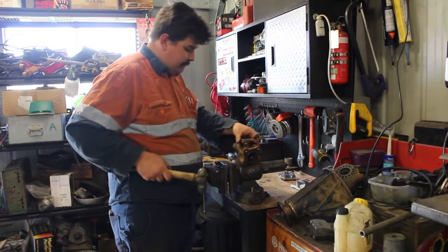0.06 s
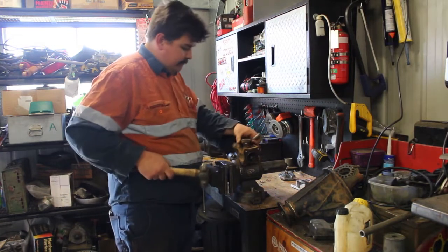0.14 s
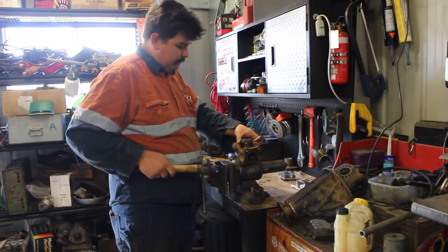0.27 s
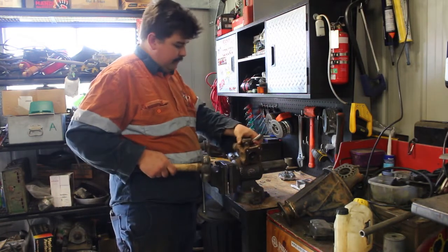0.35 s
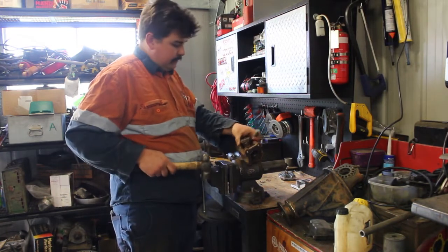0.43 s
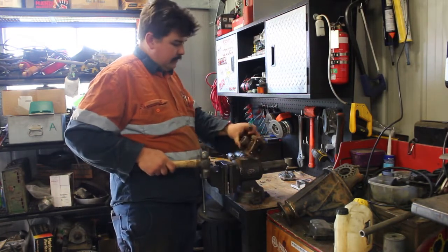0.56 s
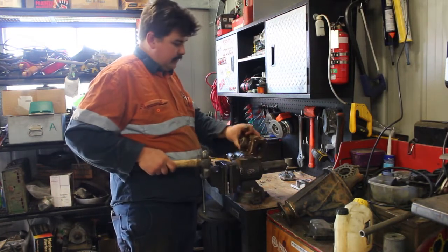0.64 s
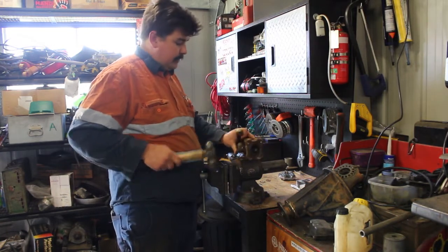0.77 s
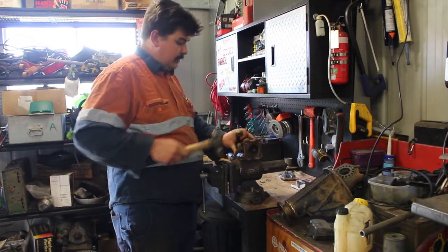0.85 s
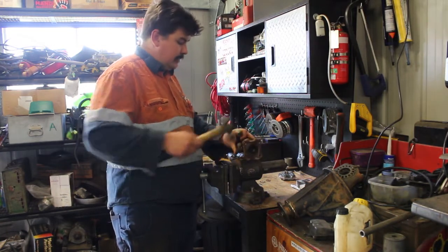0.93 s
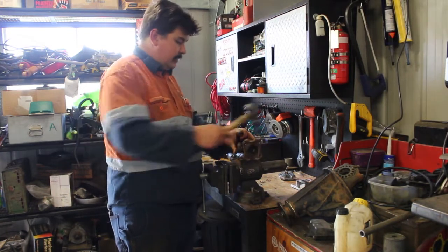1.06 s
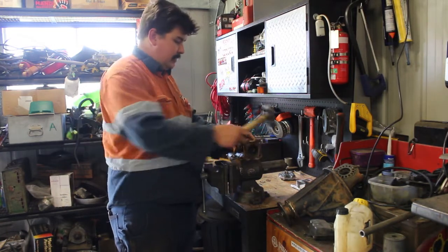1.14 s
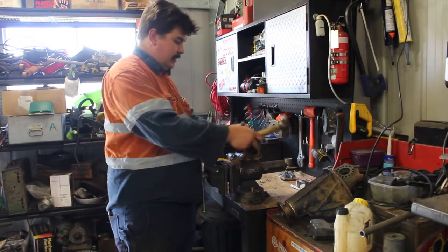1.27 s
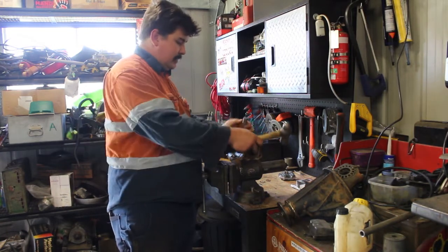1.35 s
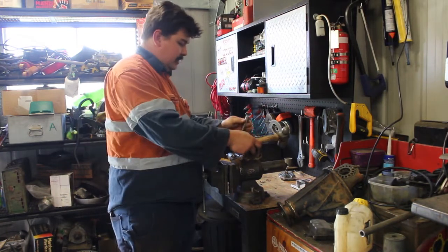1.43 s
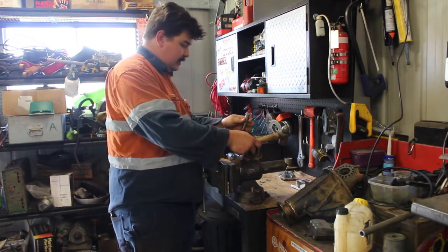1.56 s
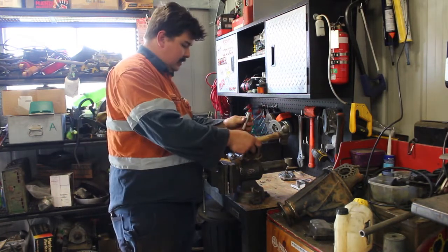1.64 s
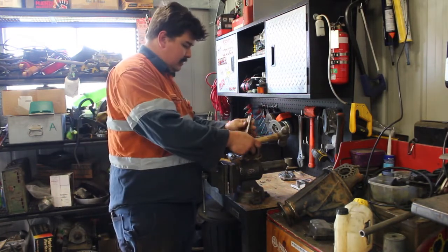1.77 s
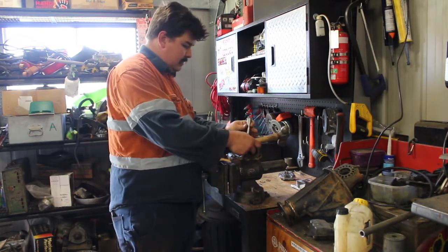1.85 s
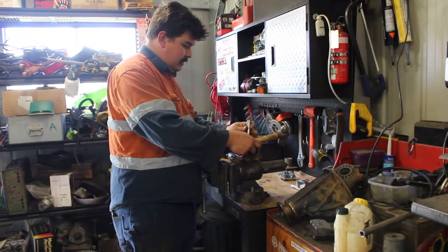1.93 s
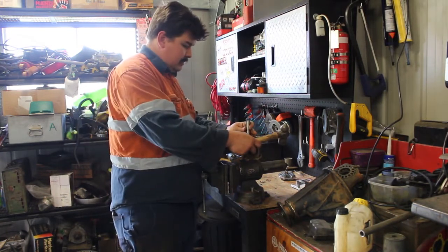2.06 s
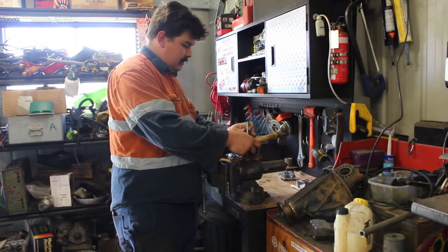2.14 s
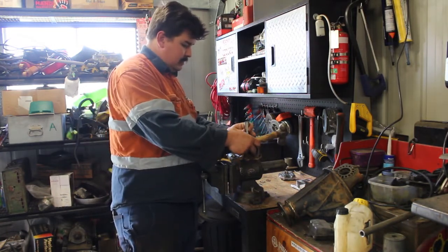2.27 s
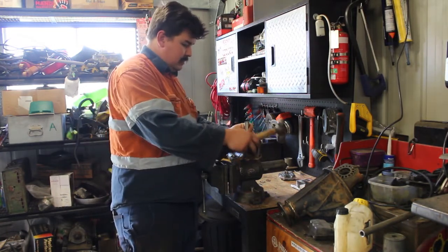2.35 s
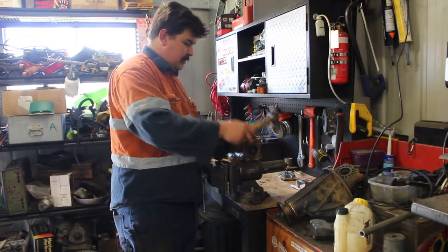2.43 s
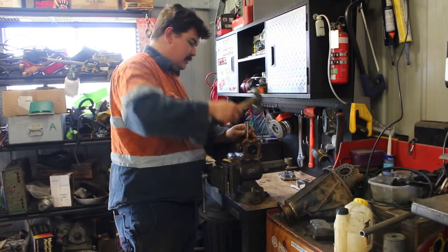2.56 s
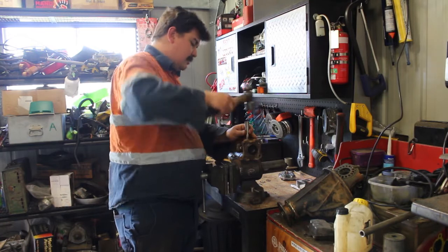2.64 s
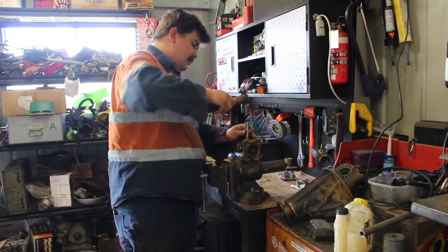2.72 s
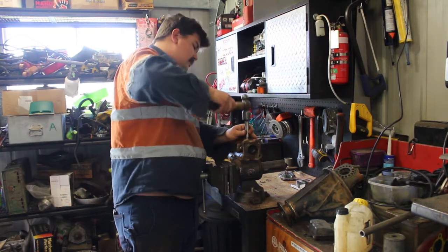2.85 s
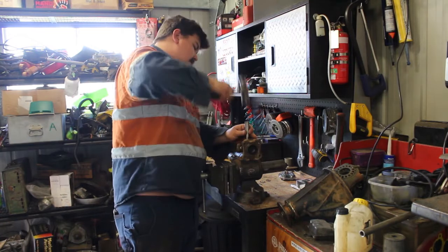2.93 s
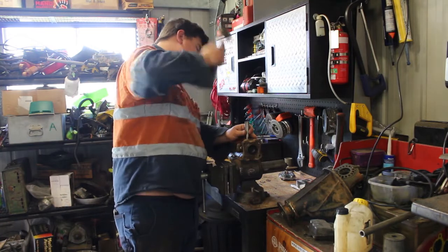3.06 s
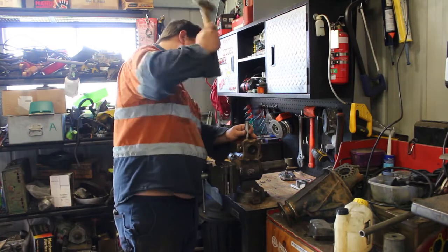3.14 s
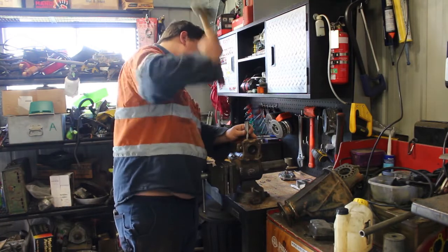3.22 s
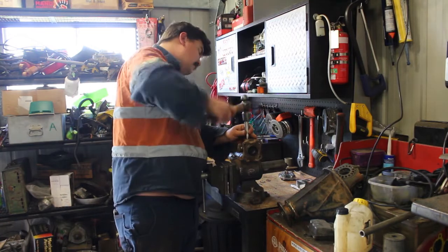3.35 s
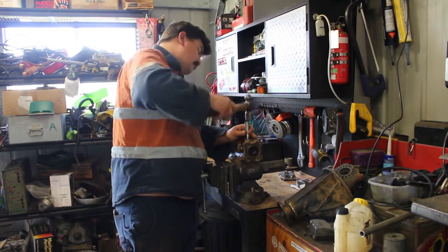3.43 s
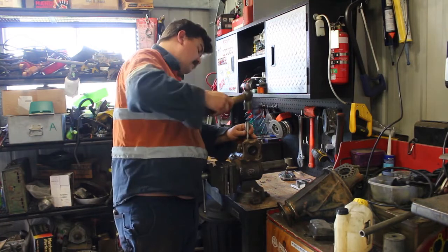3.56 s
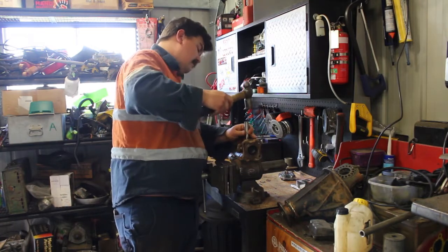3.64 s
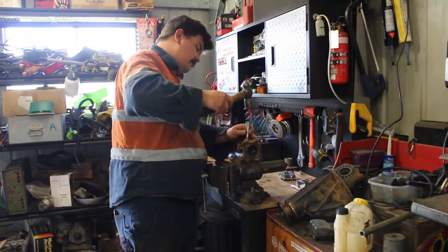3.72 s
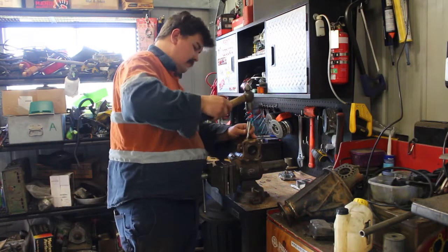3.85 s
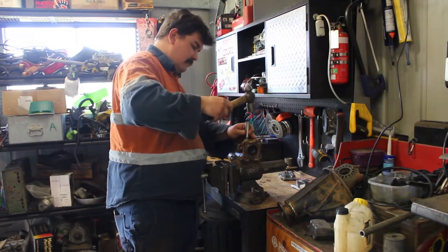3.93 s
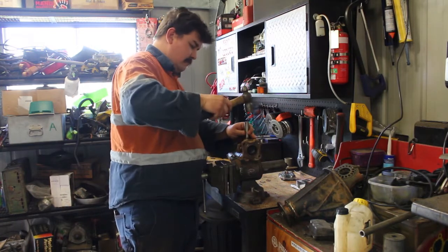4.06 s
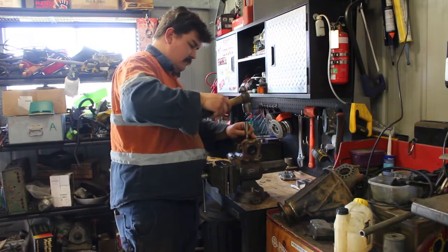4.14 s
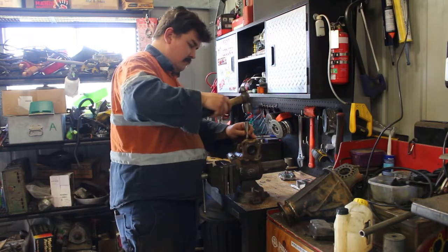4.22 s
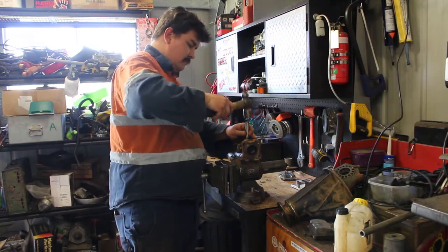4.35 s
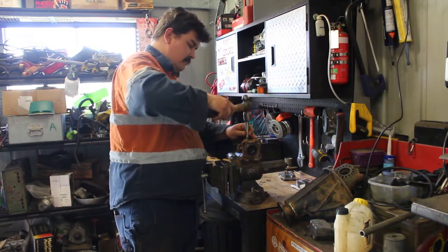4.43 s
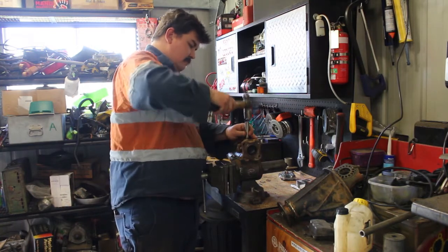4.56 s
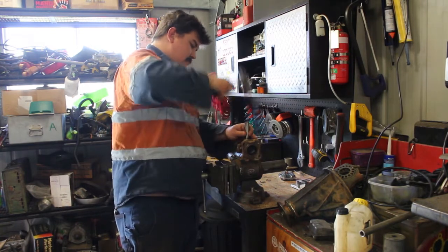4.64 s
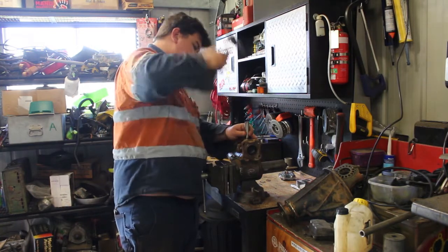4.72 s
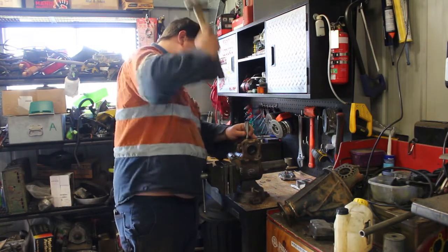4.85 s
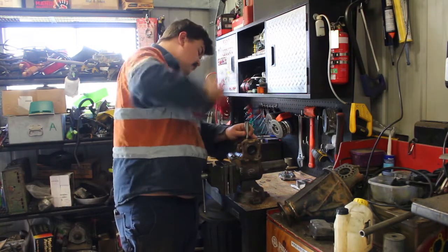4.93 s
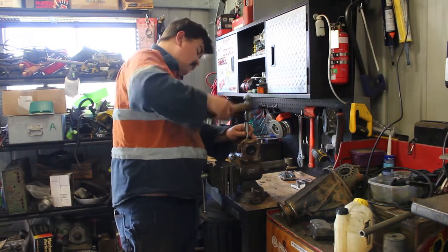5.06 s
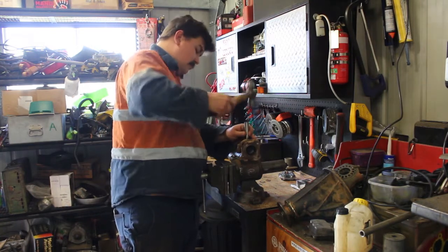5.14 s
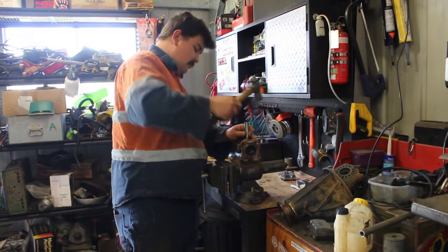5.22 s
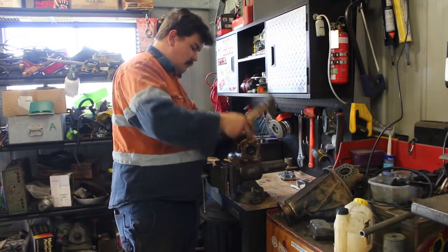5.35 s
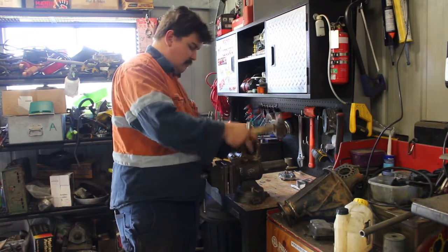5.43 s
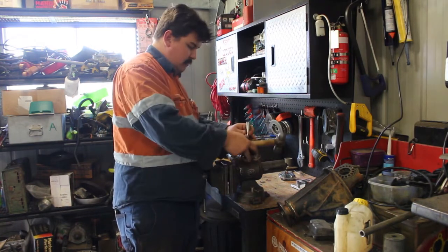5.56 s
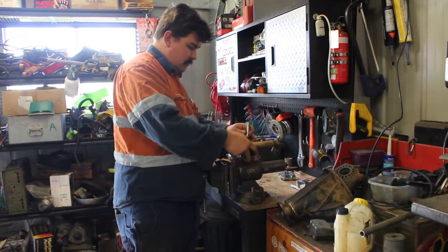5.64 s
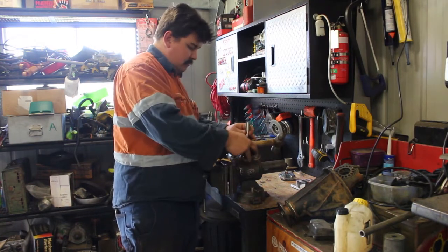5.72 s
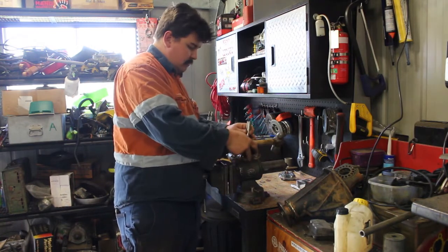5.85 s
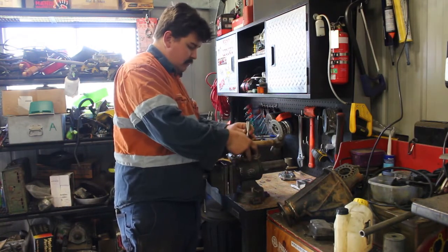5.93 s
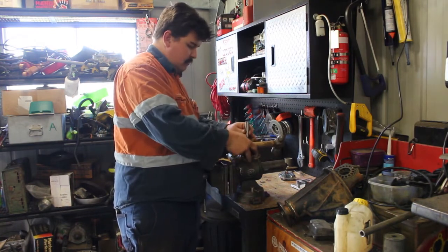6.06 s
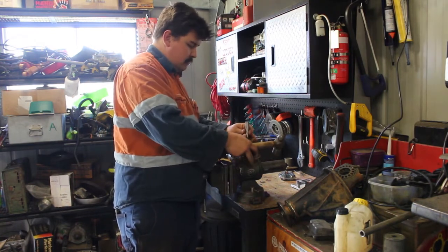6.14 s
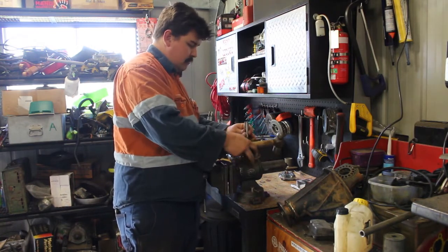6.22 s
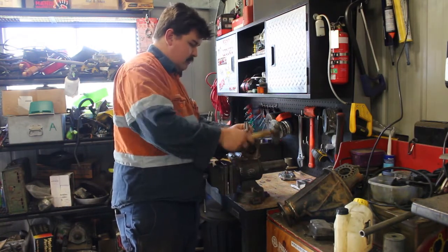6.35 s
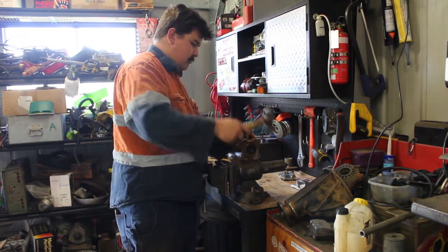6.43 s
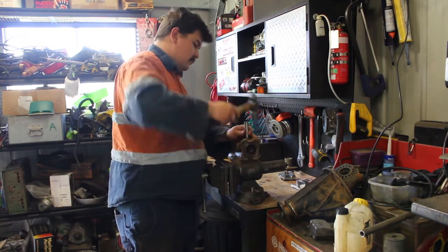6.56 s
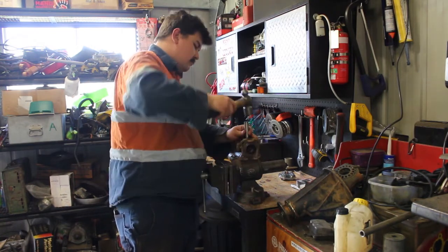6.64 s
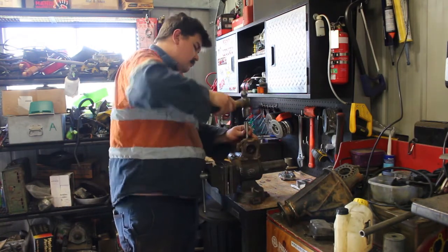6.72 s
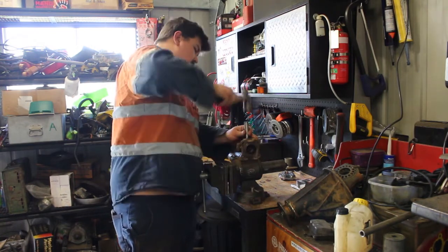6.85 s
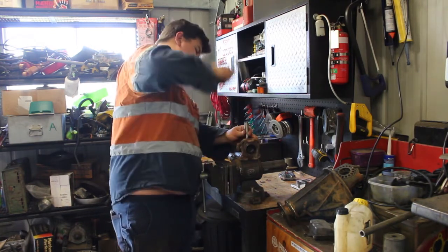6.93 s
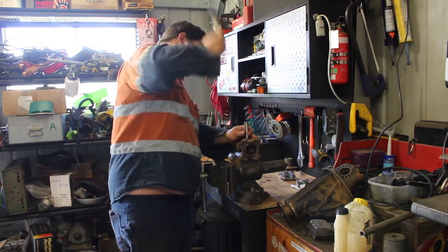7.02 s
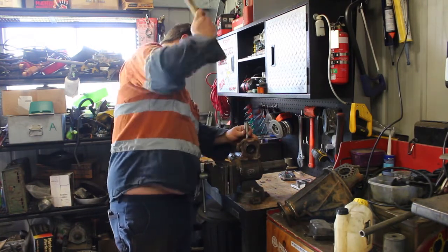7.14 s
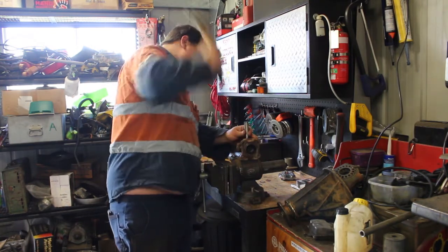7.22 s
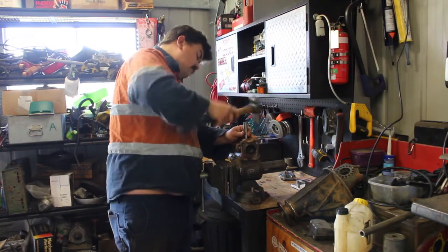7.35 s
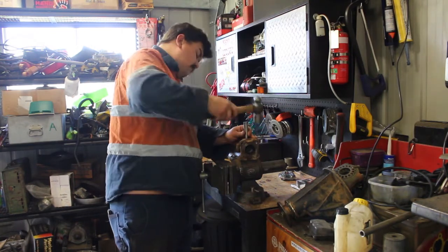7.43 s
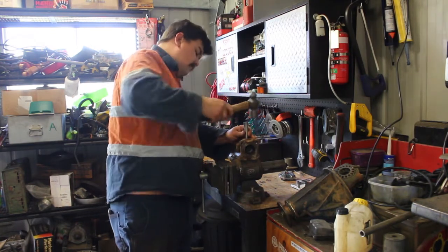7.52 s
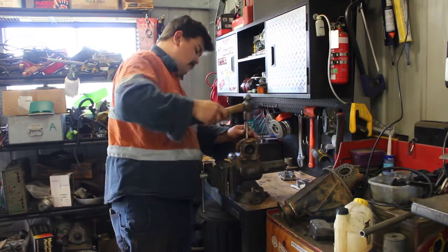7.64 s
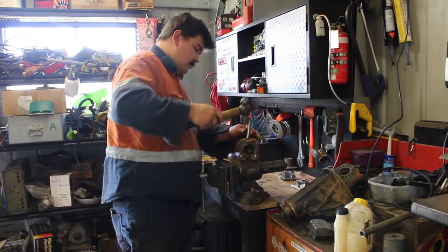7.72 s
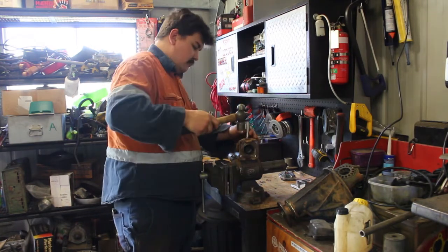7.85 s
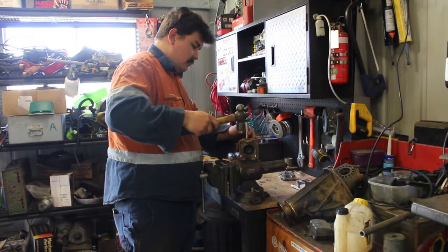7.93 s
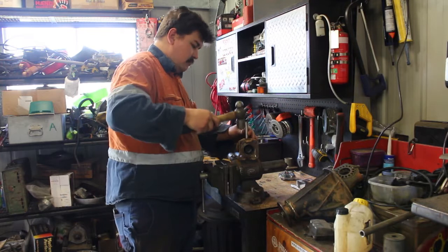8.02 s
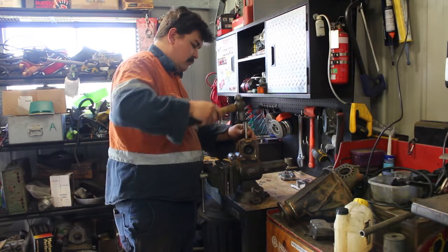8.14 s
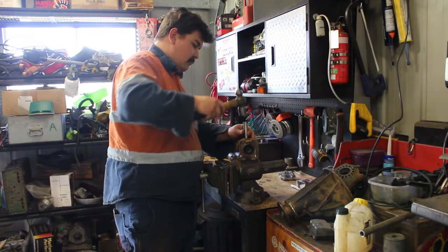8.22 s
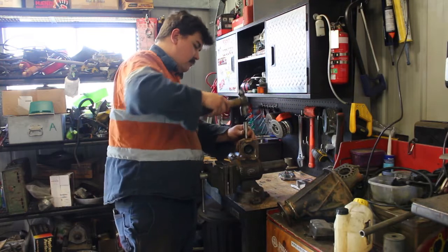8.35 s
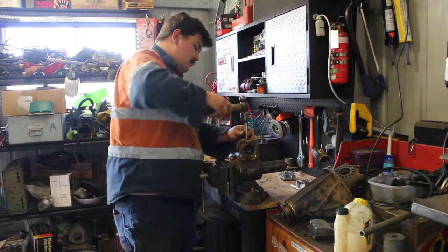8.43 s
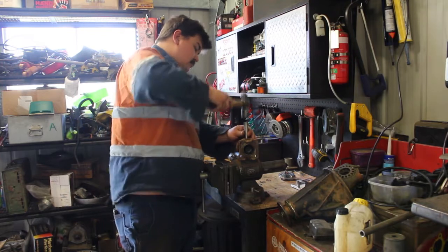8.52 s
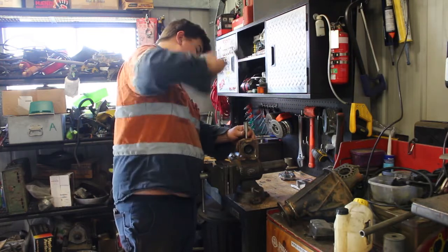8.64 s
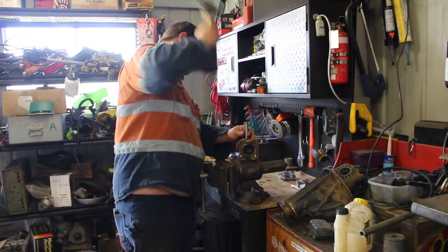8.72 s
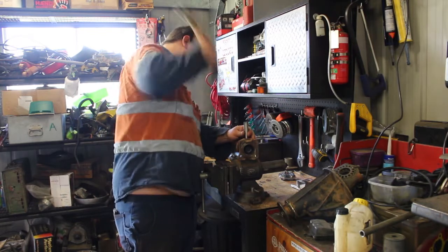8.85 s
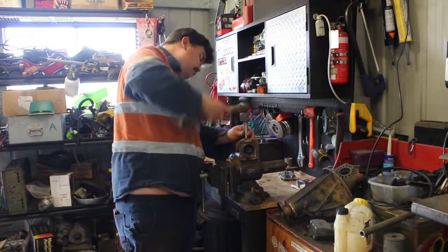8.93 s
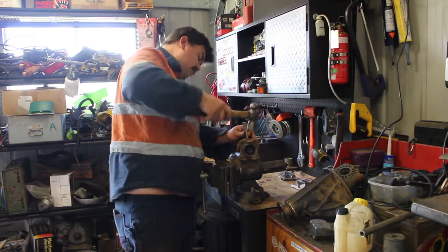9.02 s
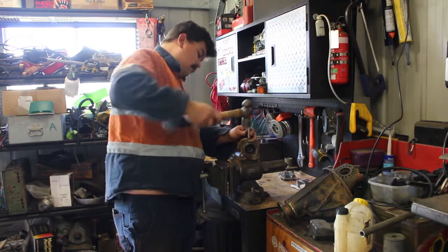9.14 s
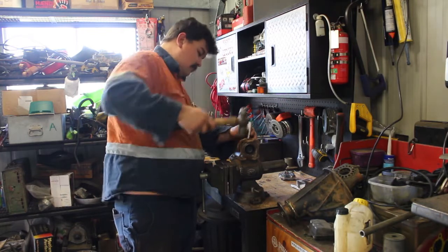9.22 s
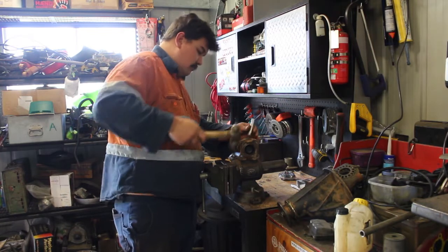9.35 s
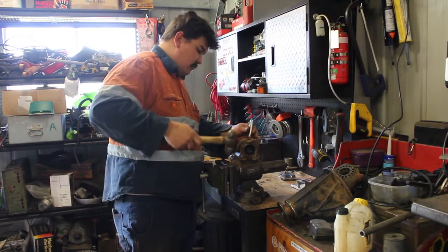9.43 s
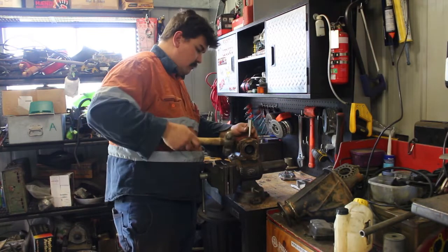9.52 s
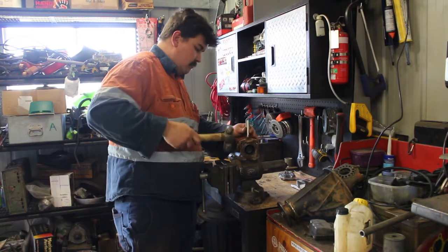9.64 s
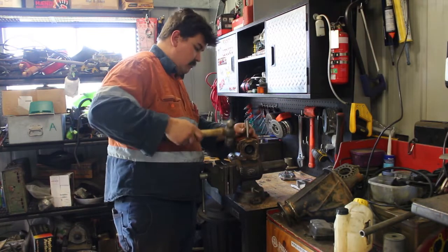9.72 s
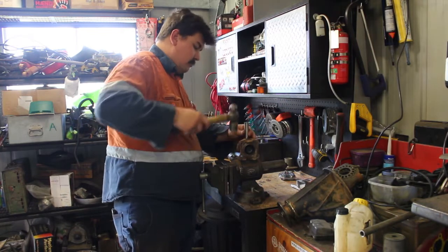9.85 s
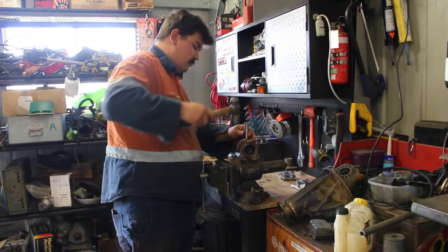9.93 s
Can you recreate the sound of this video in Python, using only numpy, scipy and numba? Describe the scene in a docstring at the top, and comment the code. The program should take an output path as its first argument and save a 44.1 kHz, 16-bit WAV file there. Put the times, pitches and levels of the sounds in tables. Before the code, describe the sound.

Heavy hammer blows clang on a clamped steel part in a small metal workshop, full swings alternating with lighter taps over a faint low hum.

```python
"""Heavy hammer blows clank and boom in a small sheet-metal workshop; lining-up blows alternate with full swings.
Steel hits a shaft yoke in a vise: short pulses through damped modes, then a lingering cluster of sines.
Between blows: softer knocks, clunks, ticks and scrapes, from the same steel spectrum; loose metal sings on.
Beneath: a wavering low hum, faint drones, air noise and a thin whistle, all from sines and shaped noise.
The blows overload the microphone: its limiter holds their echo level, then lets it fall."""
import sys
import numpy as np
from scipy import signal
from scipy.fft import rfft, irfft
from scipy.io import wavfile
from scipy.ndimage import minimum_filter1d
from numba import njit

SR = 44100
rng = np.random.default_rng(int(sys.argv[2]) if len(sys.argv) > 2 else 0)


def wav_out(sig):
    """Save sig, one row per channel (or a flat mono array), as 16-bit PCM at SR to the path in sys.argv[1]."""
    wavfile.write(sys.argv[1], SR, np.round(np.clip(np.atleast_2d(sig).T, -1, 1) * 32767).astype(np.int16))


N = 440118

# hammer blows, the first before time zero: t/s, relative level/dB, second bend family/dB, third bend family/dB,
#   lingering cluster: centre f/Hz, half width/octaves, relative level/dB
BLOWS = [ (-0.5, 8.5, 1, 11, 2600, .2, -20), (2.8468, -5, -8, 3, 6680, 0.45, -7.5),
         (3.3712, 10, -2, 3.5, 2350, .22, -11), (4.4425, -6.5, 4, 9, 1506, .5, -5.5),
         (4.513, -18.5, -13, 13, 2030, 0.09, -17), (5.015, 10, -1.5, 5.5, 2663, 0.24, -9.5),
         (6.8107, -6.5, -7.5, 9, 5324, 0.14, -1.5), (7.3370, 9.5, -1.5, 4, 7210, .02, -8.5),
         (8.4542, -2.5, 6, 7, 6970, .14, -6), (8.9811, 12.5, -3.5, 7.5, 2490, 0.11, -11.5)]
# part and hammer head knocking as they are lined up: t/s, relative level/dB, soft-contact corner f/Hz,
#   first bend family/dB, free-steel ping/dB, lingering cluster: centre f/Hz, relative level/dB
KNOCKS = [ (0.486, -18.5, 1110, 3.5, -46, 451, -1.5), (0.7264, -5.5, 1600, -1.5, -56, 1480, -7.5),
          (1.598, -41, 1180, 0, -32, 1180, 2), (1.973, -25.5, 2300, -4, -30, 2060, 0.5),
          (2.148, -21.5, 4000, 1.5, -42, 963, -9), (7.864, -27, 1750, -17, -43, 3970, -15),
          (8.203, -44, 1900, -14, -34, 1120, 1), (9.448, -28, 4000, 10, -8, 7340, -21),
          (9.8426, -19, 4900, 1, -9.5, 1154, -2)]


def amp(db):
    """Decibels to gain."""
    return 10 ** (np.asarray(db) / 20)


def unit_rms(x):
    """Scales a sound to rms 1."""
    return x / np.sqrt(np.mean(x ** 2) + 1e-20)


def read(points, hz):
    """Interpolates a table of f/Hz, value on a log-frequency axis."""
    f, value = np.transpose(points)
    return np.interp(np.log(hz + 1), np.log(f), value)


def add(mix, s, sound):
    """Mixes a sound in at time s, trimmed to the mix."""
    start = round(s * SR)
    sound = sound[max(-start, 0):]
    part = mix[max(start, 0):][:len(sound)]
    part += sound[:len(part)]


def noise(points, size):
    """Steady noise of rms 1, white noise filtered by a table of f/Hz, level/dB."""
    spectrum = rfft(rng.standard_normal(size))
    gain = amp(read(points, np.fft.rfftfreq(size, 1 / SR)))
    return unit_rms(irfft(spectrum * gain, size))


def hammer(corner_hz_at_0_db=10500, db_per_corner_octave=12, low_db=2, top_db=0.84):
    """A harder blow has a shorter contact, so its dulling corner rises with level; a mode cluster lingers."""
    out = np.zeros(N)
    for s, db, second_db, third_db, *lingering in BLOWS:
        corner_hz = corner_hz_at_0_db * 2 ** (db / db_per_corner_octave)
        bends_db = (low_db, second_db, third_db, top_db)
        add(out, s, amp(db) * strike(corner_hz, bends_db, cluster(*lingering)))
    return out


def strike(corner_hz, bends_db, modes, ping_direct_db=-4, ping_echo_db=-1):
    """One contact clanks, leaves modes ringing, and takes its own random paths through the room."""
    room = workshop()
    out = signal.fftconvolve(contact(corner_hz, bends_db), room)
    ping = ring(modes, size=SR // 2)
    wet = signal.fftconvolve(ping, room[:len(ping)])[:len(ping)]
    wet = unit_rms(wet) * ping.std()
    add(out, 0, amp(ping_direct_db) * ping + amp(ping_echo_db) * wet)
    return out


def contact(corner_hz, bends_db, size=4096):
    """The short clank of one contact, of energy 1: a pulse through the modes of the clamped part."""
    # colour of a hard blow: f/Hz, level/dB
    steel = [(30, -43.5), (80, -12), (140, 0), (350, 1), (1000, 3.5), (1700, -2), (2600, 0.5), (3500, -0.5),
             (5500, -9), (9000, -0.5), (11000, -12.5), (14000, -15), (16000, -31)]
    # resonances heavily damped by the jaws: f/Hz, width/Hz, lift/dB
    clamped = [(348, 10.6, 6), (543, 10.6, 6.5), (802, 17, 5), (1103, 9.8, 10), (1420, 130, 1),
               (1985, 230, 5), (2530, 57, 1.5), (4900, 47, 4), (5300, 48, 4.5), (5660, 62, 6),
               (7460, 140, -1), (8590, 210, 7), (10170, 400, 8), (11800, 93, 11), (12350, 220, 9)]
    # families of bending modes in part and vise: f/Hz, spread/octaves
    bends = [(330, 0.43), (2000, 0.18), (5100, 0.25), (7800, 0.23)]
    hz = abs(np.fft.fftfreq(size, 1 / SR)) + 1
    db = read(steel, hz) - 10 * np.log10(1 + (hz / corner_hz) ** 4)
    for f, width_hz, lift_db in clamped:
        db = db + lift_db / (1 + (2 * (hz - f) / width_hz) ** 2)
    for (f, octaves), lift_db in zip(bends, bends_db):
        db = db + lift_db * np.exp(-.5 * (np.log2(hz / f) / octaves) ** 2)
    # minimum phase: nothing sounds before the steel touches
    spectrum = np.exp(signal.hilbert(np.log(amp(db))).conj())
    clank = np.fft.ifft(spectrum).real[:size // 2]
    return clank / np.linalg.norm(clank)


def cluster(centre_hz, octaves, db, linger_db=-9, linger_t60=0.15, count=20):
    """The part is not round, so the mode that lingers splits into many close ones."""
    places = 2 * (np.arange(count) + rng.random(count)) / count - 1
    return [(centre_hz * 2 ** (octaves * place), db + linger_db, linger_t60) for place in places]


def ring(modes, size, contact_s=0.00036):
    """Dying sines that swell during the contact, each from a random point of its cycle."""
    t = np.arange(size) / SR
    tones = np.zeros(size)
    for hz, db, t60 in modes:
        tones += amp(db - 60 * t / t60) * np.sin(2 * np.pi * (hz * t + rng.random()))
    return tones * (1 - np.exp(-(t / contact_s) ** 2))


def workshop(direct_db=-7, clutter_db=-3, clutter_t60=0.091, boom_t60=2.29, echo_s=0.033, bench_db=-12,
             bench_s=0.0094, drum_hz=121, drum_db=-24, drum_t60=0.48, count=280):
    """Impulse response: direct sound, quick scatter, bench clang, room echo and slow boom of the walls."""
    # decay of the workshop: f/Hz, t60/s
    decay = [(100, 0.21), (400, 0.6), (1000, 0.44), (2500, 0.57), (5000, 0.5), (9000, 0.39), (14000, 0.35)]
    # the cluttered room returns less treble: f/Hz, level/dB
    echo_colour = [(150, -5), (1200, -1), (3000, -10), (6000, -8.5), (9000, -18.5), (14000, -15.5)]
    # long boom of the sheet walls, relative to the echo: f/Hz, level/dB
    boom = [(60, -11), (150, -19.5), (400, -28.5), (800, -34.5), (1500, -44), (3000, -51.5), (8000, -87)]
    # clang of the steel bench: f/Hz, level/dB
    clang = [(80, -15), (200, 4), (800, 9.5), (1500, 6), (3000, -4), (9000, -78)]
    hz = np.fft.rfftfreq(512, 1 / SR)
    t = np.arange(count)[:, None] * 256 / SR
    z = rng.standard_normal((count, len(hz), 2)) @ [1, 1j]
    echo_gain = amp(read(echo_colour, hz) - 60 * t / read(decay, hz))
    boom_gain = amp(read(boom, hz) - 60 * t / boom_t60)
    fade = np.hypot(echo_gain, boom_gain)
    echo = signal.istft((z * fade).T, nperseg=512)[1] / np.sqrt(128)
    t = np.arange(len(echo)) / SR
    clutter = rng.standard_normal(len(t)) * amp(-60 * t / clutter_t60)
    near = amp(clutter_db) * clutter / np.linalg.norm(clutter)
    # the bench under the vise swells a moment later
    bench = noise(clang, size=len(t)) * (t / bench_s) * np.exp(-t / bench_s)
    near += amp(bench_db) * bench / np.linalg.norm(bench)
    # its top also drums in one low mode
    drum = np.sin(2 * np.pi * drum_hz * t) * amp(-60 * t / drum_t60)
    near += amp(drum_db) * drum / np.linalg.norm(drum)
    near[0] += amp(direct_db)
    return echo + near * np.sqrt(echo_s * SR)


def louder(modes, gain_db):
    """The same modes at another level."""
    return [(hz, db + gain_db, t60) for hz, db, t60 in modes]


def handling(knock_octaves=0.0414, clunk_corner_hz=795, tick_corner_hz=12000, tick_ping_db=-18):
    """Knocks, clunks and ticks between the blows: lighter contacts on the same steel, each with its own ring."""
    # free steel pinging: f/Hz, relative level/dB, t60/s
    free_steel = [(5028, 2, .33), (5085, 1, .28), (5140, 0, .25), (7343, -5, .25), (10030, -9, .28),
                  (10140, -10, .22), (11600, -18, .22)]
    # ring of the part after every knock: f/Hz, relative level/dB, t60/s
    knock_ring = [(347.4, -2.5, 0.17), (633, -5, 0.27), (1140, -6, 0.22), (1270, -8, .18),
                  (2000, -12, 0.17), (2120, -13.5, 0.16)]
    # dull clunks of heavy steel settling: t/s, relative level/dB
    clunks = [(3.615, -27.5), (5.279, -26.5), (5.822, -44.5), (5.858, -35), (7.552, -25), (7.612, -21),
              (7.665, -22.5), (9.244, -28), (9.324, -25.5)]
    # ring of a clunk: f/Hz, relative level/dB, t60/s
    clunk_ring = [(485, 7, 0.28), (539, -11, 0.14), (541, 5, 0.22), (670, -7, 0.13)]
    # light, bright ticks of steel just touching: t/s, relative level/dB
    ticks = [(8.092, -52.5), (8.124, -44), (8.43, -45.5), (9.933, -40)]
    upper_knock_bends_db = (1, 7.5, -15.5)
    clunk_bends_db, tick_bends_db = (-4.5, -2.5, 14, -6), (-16, -3, 9, 0.5)
    out = np.zeros(N)
    for s, db, corner_hz, low_db, ping_db, centre_hz, cluster_db in KNOCKS:
        modes = knock_ring + louder(free_steel, ping_db) + cluster(centre_hz, knock_octaves, cluster_db)
        add(out, s, amp(db) * strike(corner_hz, (low_db, *upper_knock_bends_db), modes))
    for s, db in clunks:
        add(out, s, amp(db) * strike(clunk_corner_hz, clunk_bends_db, clunk_ring))
    for s, db in ticks:
        add(out, s, amp(db) * strike(tick_corner_hz, tick_bends_db, louder(free_steel, tick_ping_db)))
    return out


def loose_metal(shake_db=-40.5, shake_db_per_db=0.77, shimmer=.18):
    """Every blow and knock sets loose metal nearby singing in sympathy; it shimmers as it sways."""
    # singing modes: f/Hz, relative level/dB, t60/s
    loose = [(657, 5, 2.76), (673, 1, 3.7), (689, 10, 2.53), (674, 2.5, 2.4), (726.5, 9.5, 2.36),
             (779, 6.5, 2.77), (807.5, -9, 0.73), (842, -14, 2.3)]
    out = np.zeros(N)
    for s, db, *_ in BLOWS + KNOCKS:
        add(out, s, amp(shake_db + shake_db_per_db * db) * ring(loose, size=2 * SR))
    sway = noise([(8, 1), (30, -4.0), (90, -43.0), (200, -120)], size=N)
    return out * (1 + shimmer * sway)


def scrapes(corner_hz=800, body_db=5, grit_db=9, slips_per_s=450):
    """Dense little slips drive the part's modes as its steel is dragged round in the jaws."""
    # drags: start t/s, end t/s, rms level/dB
    drags = [(0.0, 0.316, -56), (0.372, 0.456, -33), (5.623, 5.683, -35), (5.728, 5.872, -26),
             (9.763, 9.862, -47)]
    out = np.zeros(N)
    body = signal.fftconvolve(contact(corner_hz, [body_db, 0, grit_db, grit_db]), workshop())
    for start, end, db in drags:
        size = max(round((end - start) * SR), 100)
        force = rng.standard_normal(SR)[:size]
        slips = force * (rng.random(SR)[:size] < slips_per_s / SR)
        drag = signal.fftconvolve(slips * signal.windows.tukey(size, .7), body)
        add(out, start, amp(db) * drag / (drag[:size].std() + 1e-9))
    return out


def whistle(low_hz=3130, high_hz=3172, width_hz=14, ramp_s=0.026):
    """Two close, unsteady lines of narrow noise, barely above the air."""
    # faint thin whistles: start t/s, end t/s, rms level/dB
    whistles = [(4.12, 4.5, -60), (4.8, 5.026, -58)]
    t, hz = np.arange(N) / SR, np.fft.rfftfreq(N, 1 / SR)
    lines = sum(np.exp(-.5 * ((hz - f) / width_hz) ** 2) for f in (low_hz, high_hz))
    level = np.zeros(N)
    for start, end, db in whistles:
        level += amp(db) * np.clip(np.minimum(t - start, end - t) / ramp_s, 0, 1)
    return level * unit_rms(irfft(rfft(rng.standard_normal(N)) * lines, N))


def background(air_db=-47, drone_waver=0.44, swell_db=3.5, wander_hz=0.78, hum_hz=70.3, hum_loud_db=-37,
               hum_rise_hz_per_db=0.8, hum_flutter=.16):
    """A hum, higher in pitch as its tabled level falls, with narrow rumble, wavering drones and air noise."""
    # hum before its random swell: t/s, level/dB
    hum_level = [(0, -38), (1.6, -39), (2.1, -43), (2.5, -56.5), (3.6, -54.5), (3.9, -43.5), (4.4, -46.5),
                 (4.9, -42.5), (6.1, -38.5), (7.2, -42.5), (8.7, -39), (9.98, -37)]
    # fainter drones, probably of machines, before their waver: f/Hz, level/dB
    drones = [(119.5, -54), (160.5, -56.5), (240, -62)]
    # colour of the air: f/Hz, relative level per Hz/dB
    air = [(15, -58), (25, -20), (76, -4.5), (105, -29), (170, -21.5), (206, -19.5), (439, -29),
           (14000, -43), (16000, -51.5)]
    t = np.arange(N) / SR
    slow = [(1, 0), (4, -2), (9, -25), (40, -120)]
    db = np.interp(t, *np.transpose(hum_level))
    hz = hum_hz + hum_rise_hz_per_db * (hum_loud_db - db) + wander_hz * noise(slow, size=N)
    tone = np.sqrt(2) * np.sin(2 * np.pi * np.cumsum(hz) / SR)
    flutter = noise([(45, -73.5), (62, -12.0), (72, -17), (84, 5), (110, -88.5)], size=N)
    swell = swell_db * noise(slow, size=N)
    hum = amp(db + swell) * (tone + hum_flutter * flutter)
    drone = sum(amp(level_db) * np.sqrt(2) * np.sin(2 * np.pi * f * t) for f, level_db in drones)
    waver = noise([(2, 2.0), (10, -18.0), (60, -100)], size=N)
    drone = drone * (1 + drone_waver * waver)
    return hum + drone + amp(air_db) * noise(air, size=N)


def scene():
    """All sources, the same in both channels."""
    mono = hammer() + handling() + loose_metal() + scrapes() + whistle() + background()
    return np.array([mono, mono])


@njit
def follow_peaks(over_db, attack, recover_db):
    """Gain reduction that climbs quickly towards each overload and sinks steadily."""
    cut_db, out = 0., np.empty(len(over_db))
    for i in range(len(over_db)):
        if over_db[i] > cut_db:
            cut_db = cut_db + attack * (over_db[i] - cut_db)
        else:
            cut_db = max(cut_db - recover_db, 0.)
        out[i] = cut_db
    return out


def record(dry, threshold_db=-7.0, attack_s=0.0053, recover_db_per_s=110, clip_level=.86, edge_hz=15800):
    """A limiter that lets the first milliseconds through to clip; then the band limit."""
    peak = -minimum_filter1d(-abs(dry).mean(0), size=129, origin=64)
    over_db = 20 * np.log10(peak + 1e-9) - threshold_db
    cut_db = follow_peaks(over_db, 1 / (attack_s * SR), recover_db_per_s / SR)
    clipped = np.clip(dry * amp(-cut_db), -clip_level, clip_level)
    lowpass = signal.firwin(255, edge_hz, window=("kaiser", 8), fs=SR)
    return signal.oaconvolve(clipped, lowpass[None], "same")


dry = scene()
out = record(dry)
wav_out(out)
```